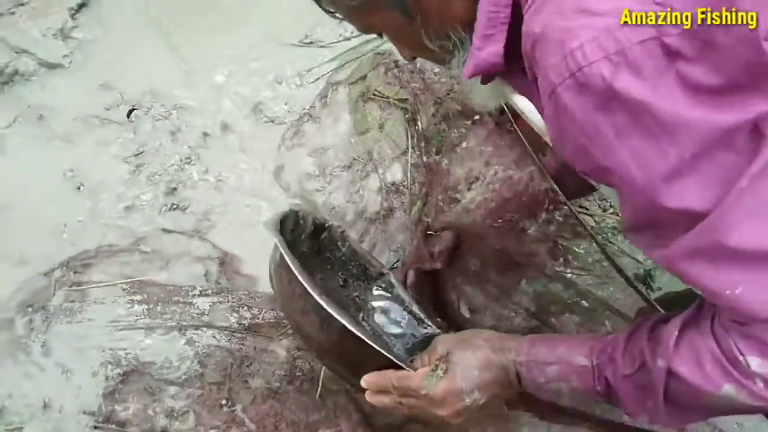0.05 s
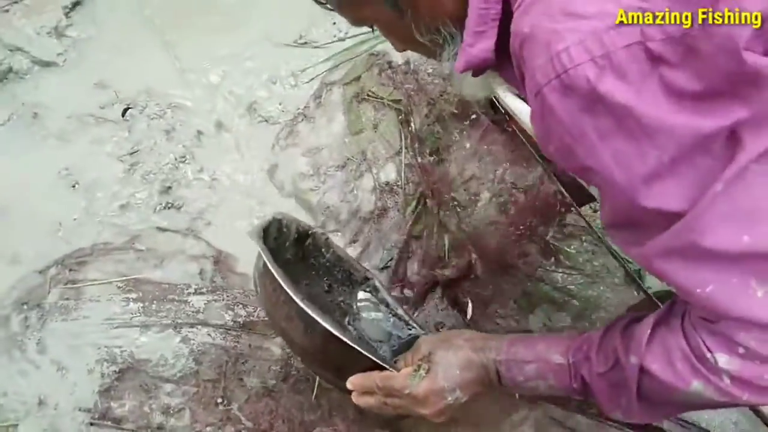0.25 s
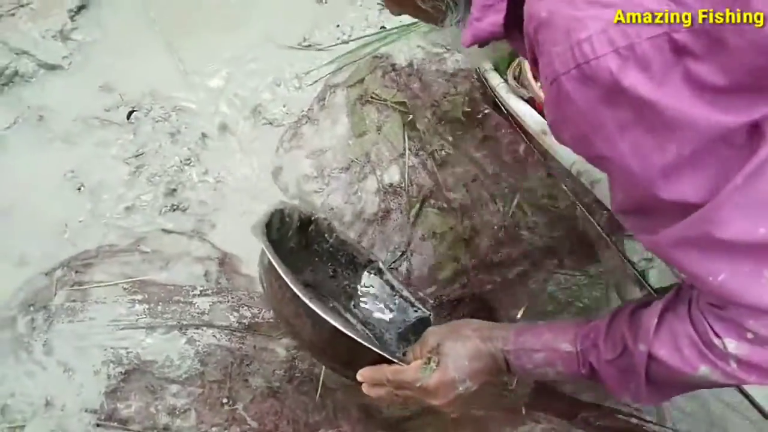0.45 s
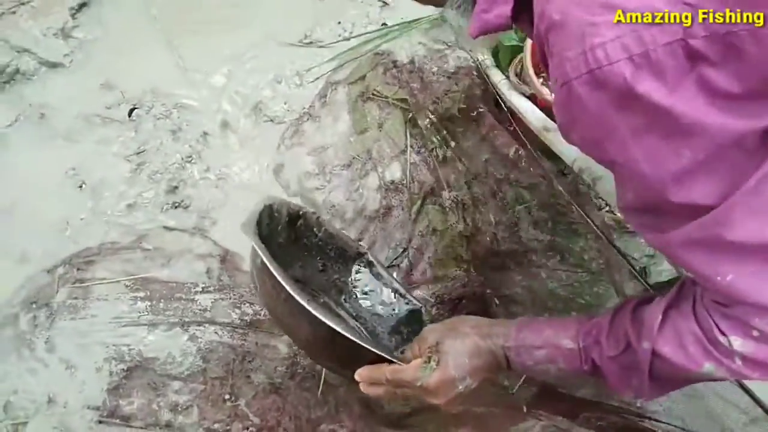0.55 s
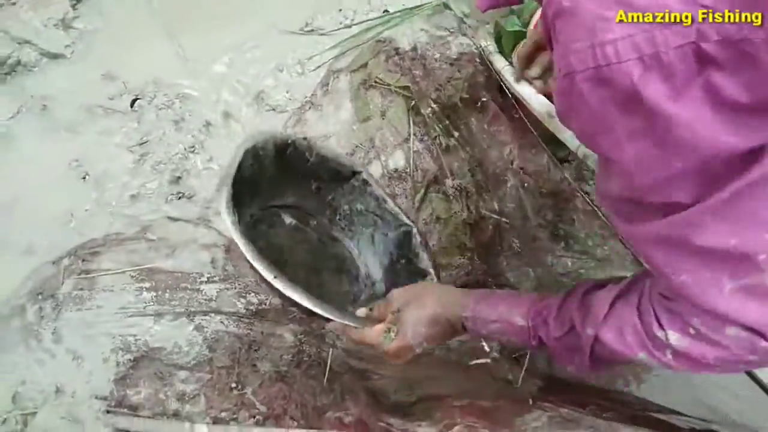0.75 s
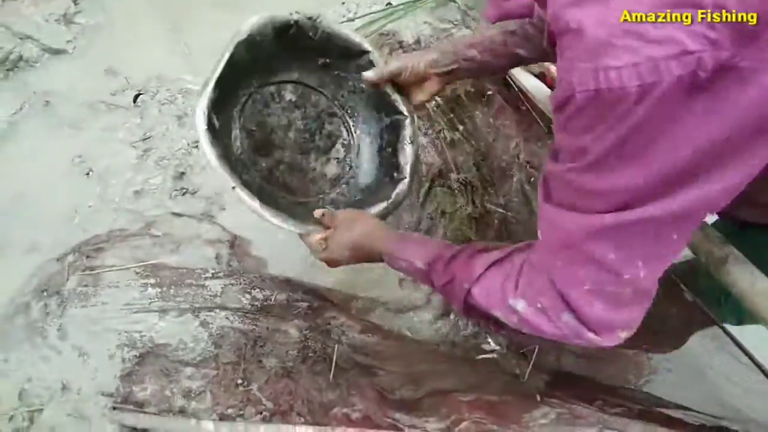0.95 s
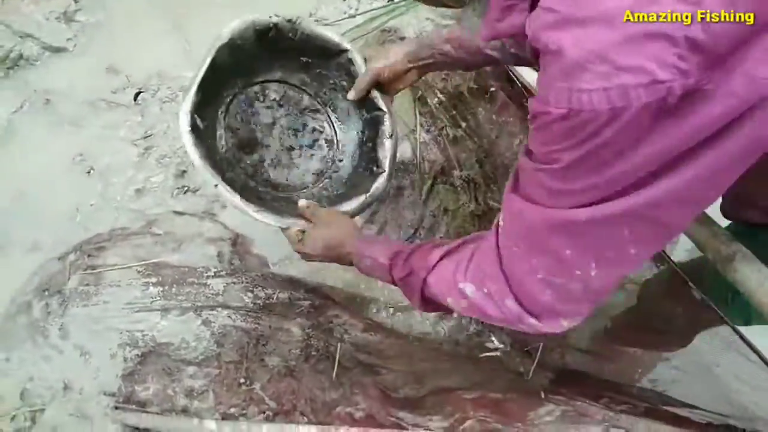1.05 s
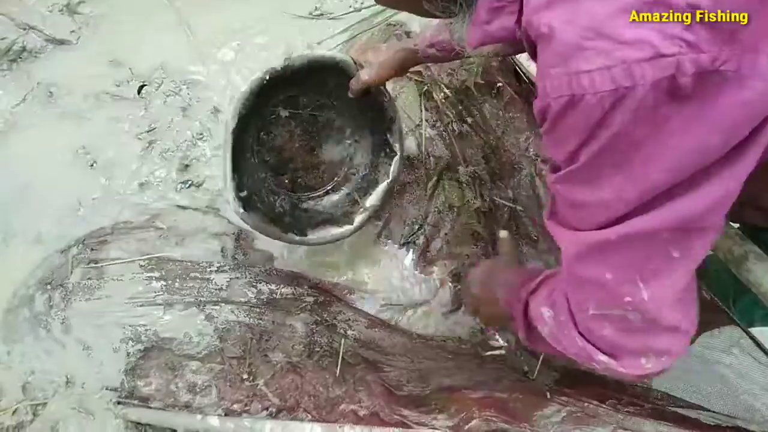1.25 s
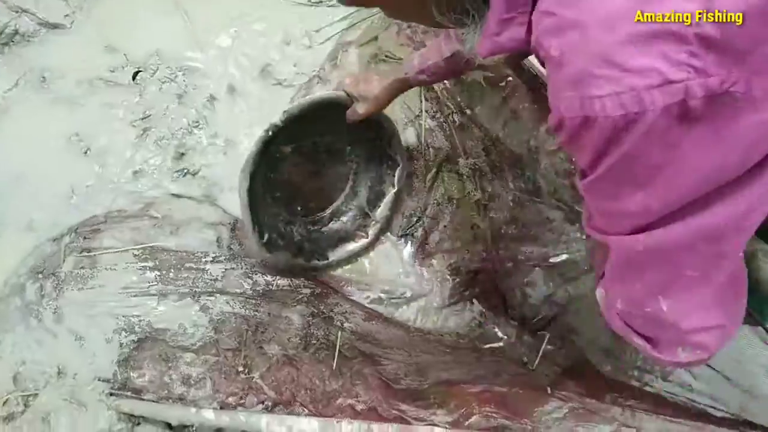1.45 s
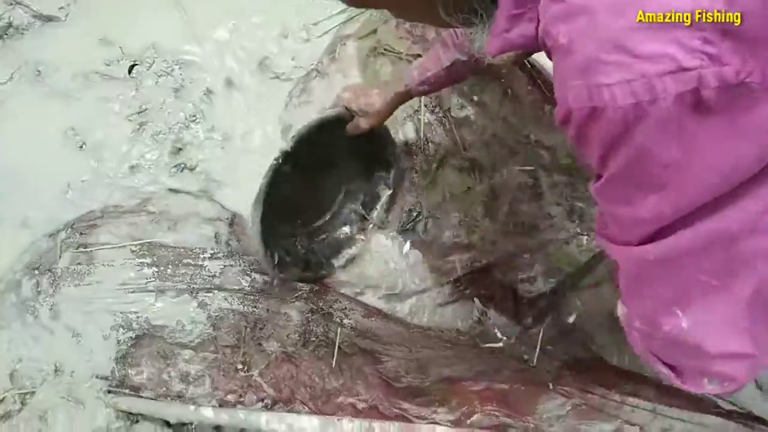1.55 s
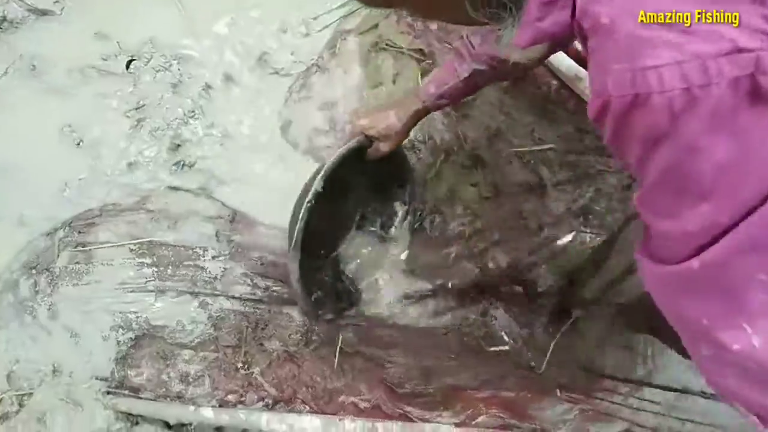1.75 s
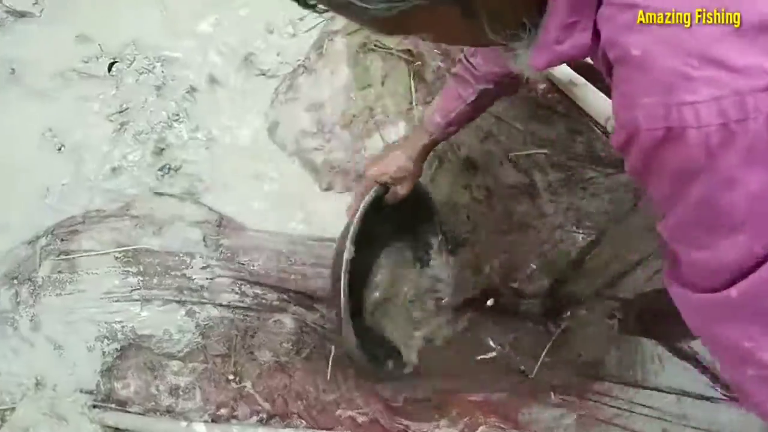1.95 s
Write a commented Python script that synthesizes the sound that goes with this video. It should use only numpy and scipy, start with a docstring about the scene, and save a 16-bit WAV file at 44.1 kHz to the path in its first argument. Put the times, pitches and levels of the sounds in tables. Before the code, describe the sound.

Close, noisy splashes of muddy water thrown from a metal bowl land and gurgle in the open air. A short metallic knock follows, then a smaller splash and a gritty, wet scrape as the bowl scoops again.

```python
"""Muddy water splashes down as it is bailed with a metal bowl at a bank, close by in the open air.
Two sheets of water slap down and break into clicking droplets and ringing bubbles. The bowl knocks,
smacks back into the shallows and scrapes through wet mud for the next scoop.
Soft thuds and a faint low rumble lie underneath."""
import sys
import numpy as np
from scipy import signal
from scipy.fft import rfft, irfft
from scipy.io import wavfile
from scipy.ndimage import uniform_filter1d

SR = 44100
rng = np.random.default_rng(int(sys.argv[2]) if len(sys.argv) > 2 else 0)


def log_audio(samples):
    """Write samples as a 16-bit WAV file to the path given in sys.argv[1]."""
    # one column per channel
    frames = np.atleast_2d(samples).T
    # limit to full scale, then quantise
    limited = np.clip(frames, -1, 1)
    pcm = np.round(limited * 32767).astype(np.int16)
    wavfile.write(sys.argv[1], SR, pcm)


N = 88200

# The bright tone of spray. Each row: frequency in Hz, relative level in dB.
SPRAY_TONE = [(900, -20.5), (1800, -5), (2500, -8.5), (3600, -0.5), (4400, -1.5), (5700, 3.5), (6700, -1.5),
              (7600, -13.5), (9000, -22.5), (12000, -38), (15500, -36)]


def falling_water():
    """Droplets and tiny bubbles make the spray; larger bubbles churn and gurgle below it."""
    # How loud the falling water is. Each row: time in seconds, spray level in dB, churn level in dB.
    flow_levels = [(0, -47, -55), (.16, -42.5, -50), (.26, -31.5, -45.5), (.31, -33.5, -39),
                   (.35, -30.5, -43.5), (.39, -37, -41), (.46, -37, -49), (.54, -41.5, -57.5),
                   (.59, -37, -42), (.66, -36.5, -39), (.77, -35, -38.5), (.82, -31.5, -37.5),
                   (.88, -39, -43.5), (.94, -38.5, -43.5), (1.04, -46.5, -50.5), (1.12, -46.5, -52.5),
                   (1.22, -51.5, -59.5), (1.42, -50, -50), (1.51, -54.5, -59), (1.65, -57, -64.5),
                   (2, -52.5, -56)]
    # How loud the heavy water gurgles. Each row: time in seconds, level in dB.
    gurgle_levels = [(0, -51.5), (.06, -64), (.19, -67.5), (.28, -49.5), (.37, -55.5), (.56, -72),
                     (.66, -52), (.81, -44.5), (.92, -47.5), (1.04, -56.5), (1.22, -58), (1.43, -50),
                     (1.52, -63.5), (2, -62.5)]
    # The tones of churning and gurgling. Each row: frequency in Hz, relative level in dB.
    churn_tone = [(300, -11.5), (600, -8.5), (850, -1), (1080, -3.5), (1320, 3), (1650, 0.5), (2200, -13),
                  (3500, -27), (12000, -61)]
    gurgle_tone = [(80, -23.5), (160, -9.5), (250, -14), (370, 2.5), (540, -1.5), (800, -9), (1600, -43),
                   (8000, -78)]
    drops = patter(per_s=3000, spread_db=2.5, mist_db=-4)
    fizz = undb(-8.5) * bubbles(per_s=900, low_hz=1974, high_hz=7300, cycles=39)
    tinkle = undb(-14) * bubbles(per_s=130, low_hz=2020, high_hz=6940, cycles=72)
    spray = colour(drops + fizz + tinkle, SPRAY_TONE)
    wash = undb(-5.5) * colour(patter(per_s=1500, spread_db=2, mist_db=0), churn_tone)
    churn = colour(bubbles(per_s=700, low_hz=560, high_hz=2280, cycles=19.8), churn_tone) + wash
    gurgle = colour(bubbles(per_s=260, low_hz=157.4, high_hz=676, cycles=12.6), gurgle_tone)
    return (steady(spray, span_s=0.064) * curve(flow_levels, column=1)
            + steady(churn, span_s=0.15) * curve(flow_levels, column=2)
            + steady(gurgle, span_s=0.055) * curve(gurgle_levels))


def slaps():
    """Each lump of water thumps, smacks as its air pockets collapse, and throws off spray."""
    # Lumps of water landing. Each row: start, hold and fade time in seconds,
    # then thump, smack and spray levels in dB.
    landings = [(0, 0.0015, 0.014, -42, -40.5, -44), (.034, 0.0057, 0.0048, -66, -40.5, -42.5),
                (0.068, 0.0022, 0.006, -48, -39, -38), (0.079, 0.0032, .007, -49, -48, -36),
                (0.119, 0.016, 0.0098, -60, -46, -40.5), (.280, 0.0031, 0.0036, -51, -26.5, -43),
                (0.322, 0.012, 0.0034, -31.5, -23.5, -31.5), (0.33, 0.0081, 0.017, -44, -33, -25.5),
                (0.413, 0.0052, 0.012, -55, -48, -34.5), (0.73, 0.011, 0.01, -51, -38, -33.5),
                (0.801, 0.0061, 0.0097, -35, -32.5, -32), (1.083, 0.005, 0.019, -45, -44.5, -43),
                (1.154, 0.0026, 0.0037, -73, -67, -38), (1.264, 0.016, 0.0084, -38, -47, -50),
                (1.344, 0.017, 0.0071, -40, -29, -33), (1.375, 0.0071, 0.019, -47, -41.5, -41),
                (1.421, 0.0056, 0.01, -44, -47.5, -45), (1.611, 0.0087, 0.0041, -70, -85, -46),
                (1.783, .004, 0.0066, -55, -46, -54), (1.790, 0.0015, 0.0061, -48.5, -44.5, -33.5)]
    # The tones of the low thump and the sharper smack. Each row: frequency in Hz, relative level in dB.
    thump_tone = [(40, -50), (90, -32), (150, -5), (230, -2), (380, 3.5), (540, 1.5), (800, -3),
                  (1600, -42), (8000, -70)]
    smack_tone = [(300, -20), (600, -10.5), (880, -5), (1120, -8.5), (1300, 2.5), (1550, -4.5),
                  (2200, -9.5), (4000, -4.5), (12000, -77)]
    textures = []
    for tone in (thump_tone, smack_tone, SPRAY_TONE):
        drops = patter(per_s=4000, spread_db=2, mist_db=-4)
        textures.append(steady(colour(drops, tone), span_s=.005))
    out = np.zeros(N)
    for start, hold, fade, *levels_db in landings:
        blend = undb(levels_db) @ np.array(textures)  # add the three, each at its own level
        out += blend * burst(start, attack_s=0.0045, hold_s=hold, fade_s=fade)
    return out


def plops():
    """Single large bubbles and drops ring out, rising a little in pitch."""
    # Each row is one plop: start in seconds, pitch in Hz, level in dB, seconds to fade by 60 dB.
    single_bubbles = [(.002, 500.5, -40.5, 0.14), (.035, 4280, -28.5, .035), (.104, 712, -38.5, 0.097),
                      (.210, 6460, -21.5, .015), (0.286, 1320, -29, 0.028), (.324, 886, -20.5, 0.073),
                      (.325, 1017, -22, .05), (0.329, 1289, -14, 0.019), (.328, 237, -41.5, 0.073),
                      (0.396, 1350, -34.5, 0.046), (0.736, 360, -35, 0.051), (.803, 363, -29, 0.076),
                      (.832, 730, -25, 0.034), (0.871, 210, -29.5, 0.04), (1.084, 543, -37, 0.072),
                      (1.348, 801, -34, 0.14), (1.349, 1349, -32, 0.14), (1.421, 670, -41, 0.14),
                      (1.468, 4900, -38.5, 0.097), (1.473, 4960, -50, .25), (1.663, 191, -44, .03),
                      (1.716, 6000, -37, .03), (1.833, 270, -36, 0.016)]
    attack_s = 0.0012
    out = np.zeros(N)
    for start, hz, db, ring_s in single_bubbles:
        add(out, start, undb(db) * ring(hz, ring_s, rise=0.026, attack_cycles=attack_s * hz))
    return out


def ticks():
    """Drops and grit land close by with short, bright ticks."""
    # Each row is one tick: start in seconds, level in dB, fade time in seconds.
    hits = [(1.380, -43, .003), (1.423, -52, .002), (1.431, -54, .002), (1.686, -44, .0025),
            (1.7905, -44, .002), (1.876, -49, .002)]
    # The crisp tone of a tick. Each row: frequency in Hz, relative level in dB.
    tick_tone = [(800, -22), (2500, -9), (4000, 0), (6500, -2), (8500, -7), (11000, -17), (15500, -18)]
    loudness = sum(undb(db) * burst(start, attack_s=.0004, hold_s=0, fade_s=fade)
                   for start, db, fade in hits)
    return colour(rng.standard_normal(N), tick_tone) * loudness


def bowl_knocks():
    """Knocks make the metal bowl ring; the hand and the water keep the ringing short."""
    # Each row is one knock: start in seconds, level in dB, pitch ratio (lower when water loads the metal).
    knocks = [(1.256, -50, .8), (1.2635, -36, 1), (1.349, -37, .735), (1.423, -49, .735)]
    # The bowl's own notes. Each row: pitch in Hz, relative level in dB, seconds to fade by 60 dB.
    bowl_notes = [(490, -1, .24), (1227, 1, .1), (2085, -3, .045), (2850, -9, .055), (3750, -13, .07),
                  (5220, -12, .06)]
    out = np.zeros(N)
    for start, knock_db, ratio in knocks:
        for hz, note_db, ring_s in bowl_notes:
            add(out, start, undb(knock_db + note_db) * ring(hz * ratio, ring_s, rise=0))
    return out


def mud_scrape():
    """The rim scrapes through grit and squeezes tiny bubbles from the mud, which crackle as they burst."""
    # How loud the rim scrapes. Each row: time in seconds, level in dB.
    scrape_levels = [(1.675, -67), (1.688, -42), (1.74, -49), (1.79, -40.5), (1.825, -48), (1.9, -47),
                     (1.95, -43.5), (2, -39.5)]
    # The tone of wet mud. Each row: frequency in Hz, relative level in dB.
    mud_tone = [(300, -26), (700, -12), (1200, -5), (1700, -9.5), (2500, -11), (3200, -5), (3800, 3),
                (4500, 3), (5400, -1.5), (6600, -7), (8000, -15), (11500, -35.5), (15500, -34)]
    grit = patter(per_s=2800, spread_db=-0.5, mist_db=-1.5)
    small_bubbles = bubbles(per_s=370, low_hz=2600, high_hz=8000, cycles=48)
    squelch = small_bubbles + undb(-4.5) * bubbles(per_s=200, low_hz=860, high_hz=2720, cycles=14)
    scrape = steady(colour(grit + undb(-4.5) * squelch, mud_tone), span_s=.03)
    pops = (rng.random(N) < 110 / SR) * sizes(rng.random(N), spread_db=2.5)  # about 110 a second
    fading_pops = signal.lfilter([1], [1, -np.exp(-1 / (.001 * SR))], pops)  # 1 ms fade time
    crackle = undb(-11) * colour(fading_pops * rng.standard_normal(N), mud_tone)
    started = np.arange(N) / SR > scrape_levels[0][0]
    return (scrape + crackle) * curve(scrape_levels) * started


def reflections(sound):
    """Sound bounces off the bank and the bowl as a very short blur of echoes."""
    echoes = rng.standard_normal(N) * burst(0.0011, attack_s=0.0016, hold_s=.002, fade_s=0.0073)
    return signal.fftconvolve(sound, echoes / np.sqrt(np.sum(echoes ** 2)))[:N]


def mud_thuds():
    """Short swells of deep noise make soft thuds in the mud."""
    # Each row is one thud: start in seconds, level in dB, fade time in seconds.
    thuds = [(0, -47, 0.031), (0.094, -43, 0.021), (0.869, -43.5, 0.085)]
    # The dull tone of a thud. Each row: frequency in Hz, relative level in dB.
    thud_tone = [(25, -12), (65, -2.5), (120, 7.5), (200, -6), (500, -35), (2000, -60)]
    deep_noise = steady(colour(rng.standard_normal(N), thud_tone), span_s=0.023)
    return deep_noise * sum(undb(db) * burst(start, attack_s=0.019, hold_s=0.016, fade_s=fade)
                            for start, db, fade in thuds)


def rumble():
    """A faint, low outdoor rumble wavers by about 1 dB."""
    # The deep tone of the rumble. Each row: frequency in Hz, relative level in dB.
    rumble_tone = [(20, -26), (40, -10), (65, -1.5), (105, 2.5), (160, -6.5), (300, -11.5), (700, -19.5),
                   (2000, -20), (9000, -51.5)]
    waver_db = unit(uniform_filter1d(rng.standard_normal(N), size=4000))
    return colour(rng.standard_normal(N), rumble_tone) * undb(-57.5 + waver_db)


def patter(per_s, spread_db, mist_db):
    """Landing droplets click at random over the hiss of a fine mist."""
    when, size = rng.random((2, N))
    clicks = (when < per_s / SR) * sizes(size, spread_db) * rng.choice([-1, 1], N)
    return unit(clicks) + undb(mist_db) * rng.standard_normal(N)


def bubbles(per_s, low_hz, high_hz, cycles):
    """A swarm of bubbles of random size, each ringing for roughly the given number of cycles."""
    out = np.zeros(N)
    count = int(per_s * N / SR)
    for when, pitch, size, life in rng.random((8000, 4))[:count]:
        hz = low_hz * (high_hz / low_hz) ** pitch
        ring_s = cycles * (.5 + life) / hz
        add(out, when * N / SR, sizes(size, spread_db=1.5) * ring(hz, ring_s, rise=0.11))
    return unit(out)


def ring(hz, ring_s, rise, attack_cycles=1):
    """A pure note that starts softly and fades by 60 dB; a rise of 0.1 lifts its pitch by a tenth."""
    t = np.arange(int(ring_s * SR) + 2) / SR
    onset = 1 - np.exp(-(2 * t * hz / attack_cycles) ** 2)
    wave = np.sin(2 * np.pi * hz * t * (1 + rise * t / ring_s / 2))
    return onset * wave * np.exp(-np.log(1000) * t / ring_s)


def burst(start_s, attack_s, hold_s, fade_s):
    """Loudness that climbs, holds until hold_s after the start, then drops to 37% every fade_s."""
    t = np.arange(N) / SR - start_s
    return np.clip(t / max(attack_s, 1e-4), 0, 1) * np.exp(-np.maximum(t - hold_s, 0) / fade_s)


def sizes(chance, spread_db):
    """Turn random numbers from 0 to 1 into strengths: most near 1, a few far from it."""
    return undb(-spread_db * np.log(np.maximum(chance, .004)))


def colour(x, tone):
    """Filter a sound to follow a tone table; the result has an average power of 1."""
    hz, db = np.array(tone).T
    frequencies = np.maximum(np.arange(N + 1) * SR / (2 * N), 1)
    gains = undb(np.interp(np.log(frequencies), np.log(hz), db))
    # Folding the cepstrum makes the filter ring only after a click, never before it.
    cepstrum = irfft(np.log(gains))
    cepstrum[1:N] *= 2
    cepstrum[N + 1:] = 0
    return unit(irfft(rfft(x, 2 * N) * np.exp(rfft(cepstrum)))[:N])


def steady(x, span_s):
    """Even out swells slower than span_s and keep the fine grain."""
    return x / np.sqrt(uniform_filter1d(x ** 2, max(int(span_s * SR), 2)) + 1e-9)


def curve(table, column=1):
    """Loudness over time, gliding between the dB values in one column of a table."""
    rows = np.array(table)
    return undb(np.interp(np.arange(N) / SR, rows[:, 0], rows[:, column]))


def add(out, start_s, sound):
    """Mix a sound in at its start time."""
    i = min(max(int(start_s * SR), 0), N - 1)
    out[i:i + len(sound)] += sound[:N - i]


def undb(db):
    """Turn decibels into a number to multiply by."""
    return 10 ** (np.asarray(db) / 20)


def unit(x):
    """Scale a sound to an average power of 1."""
    return x / np.sqrt(np.mean(x ** 2) + 1e-18)


def scene():
    """Mix the water and the bowl with their echoes, the rumble and the thuds into one channel."""
    near = falling_water() + slaps() + plops() + ticks() + bowl_knocks() + mud_scrape()
    return (near + undb(-15.5) * reflections(near) + rumble() + mud_thuds())[None]


def record(dry):
    """The microphone thins the bass below 57 Hz; the recorder cuts the treble above 15650 Hz."""
    thinned = signal.sosfilt(signal.butter(2, 57, "high", fs=SR, output="sos"), dry)
    return signal.sosfilt(signal.ellip(10, .2, 70, 15650, fs=SR, output="sos"), thinned)


dry = scene()
out = record(dry)
log_audio(out)
```